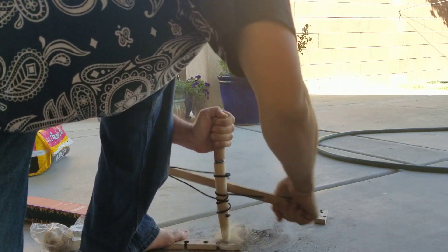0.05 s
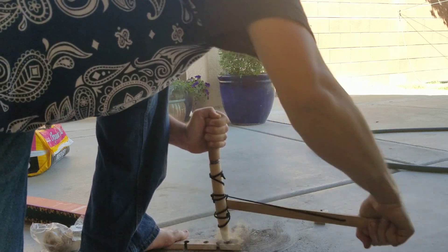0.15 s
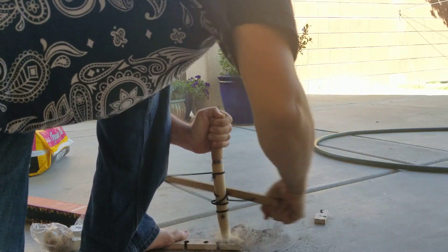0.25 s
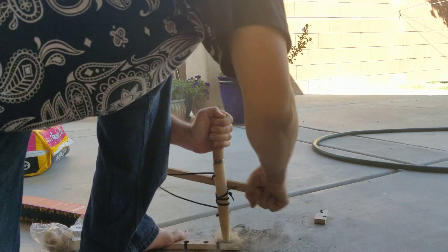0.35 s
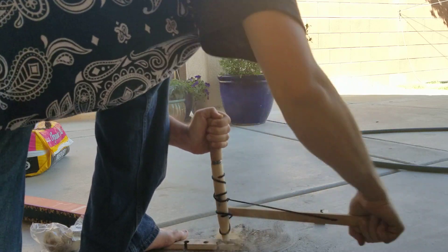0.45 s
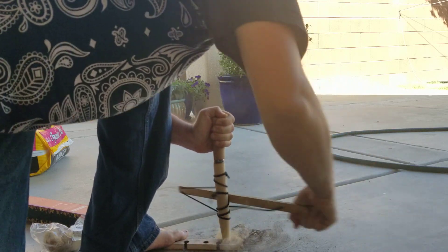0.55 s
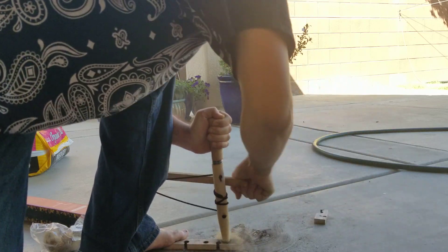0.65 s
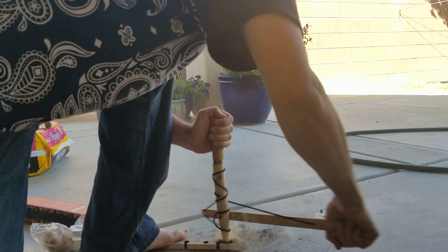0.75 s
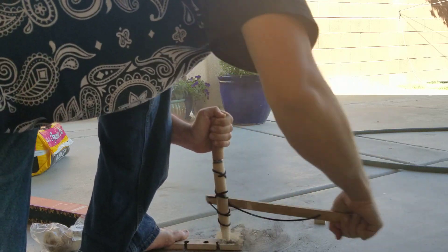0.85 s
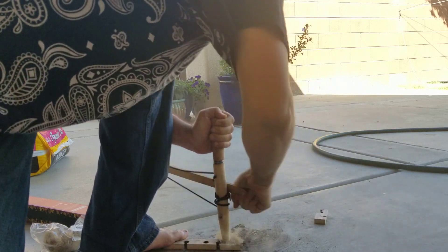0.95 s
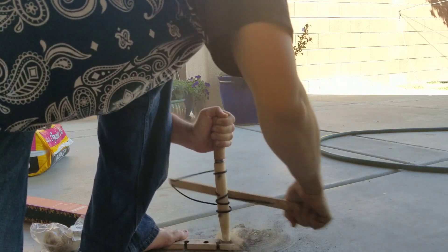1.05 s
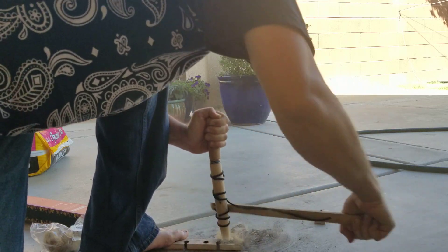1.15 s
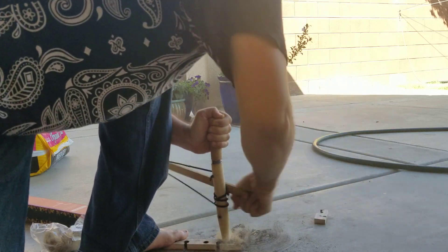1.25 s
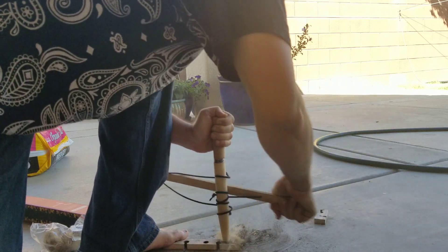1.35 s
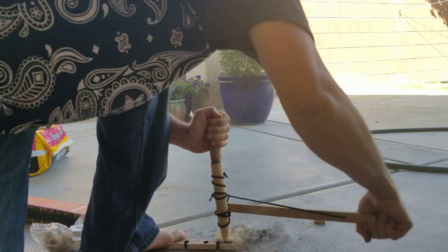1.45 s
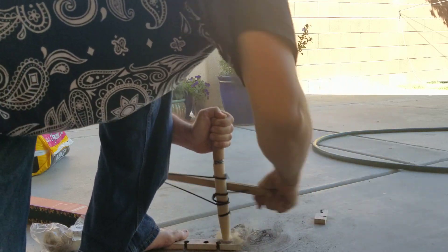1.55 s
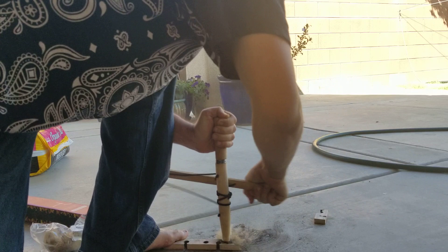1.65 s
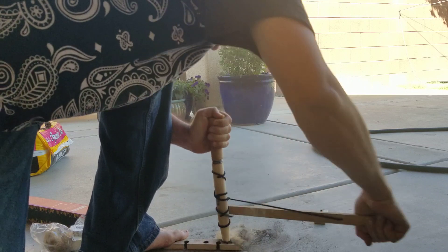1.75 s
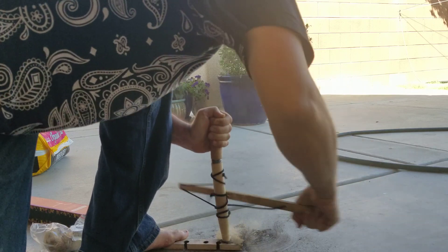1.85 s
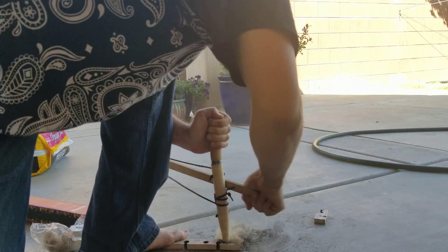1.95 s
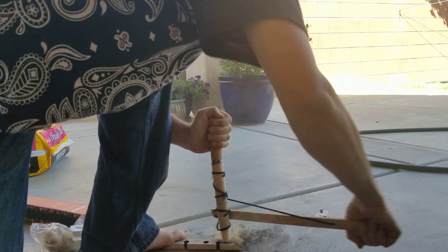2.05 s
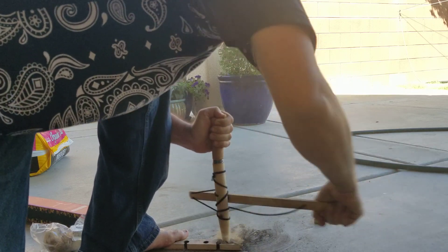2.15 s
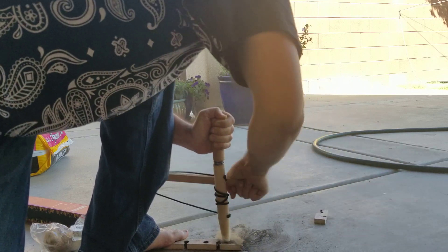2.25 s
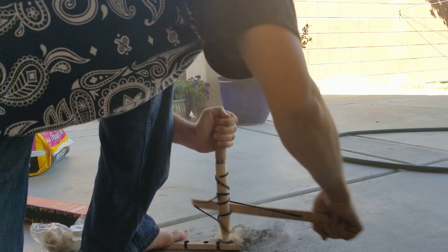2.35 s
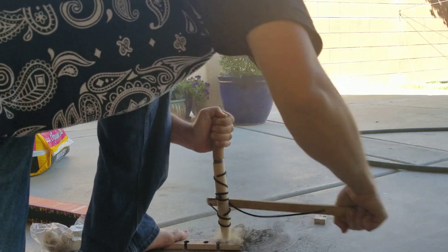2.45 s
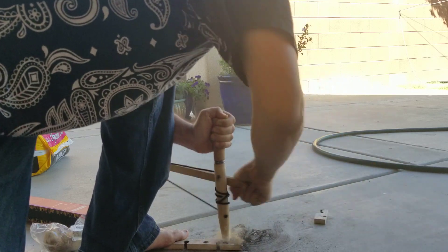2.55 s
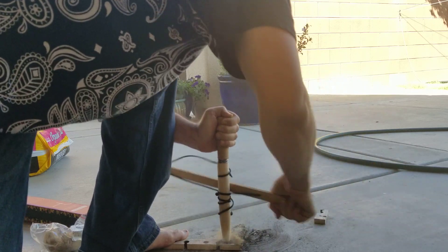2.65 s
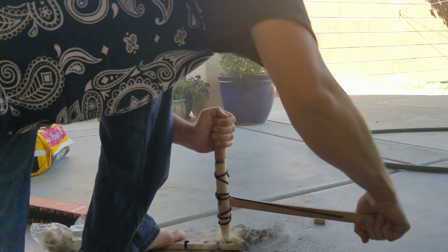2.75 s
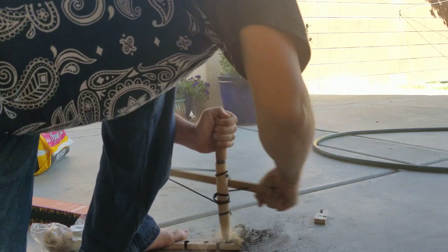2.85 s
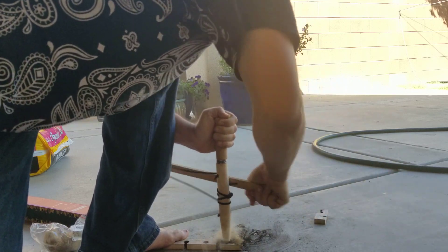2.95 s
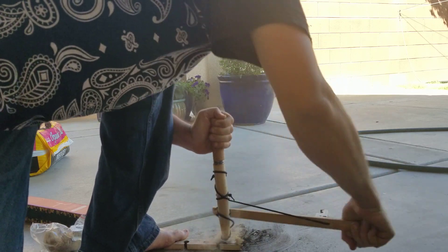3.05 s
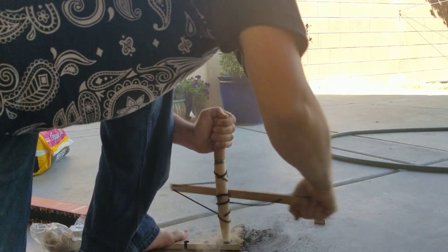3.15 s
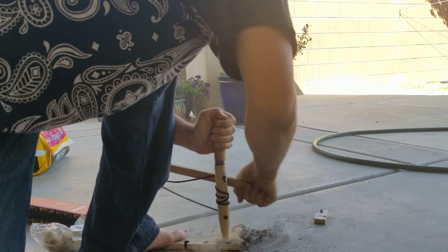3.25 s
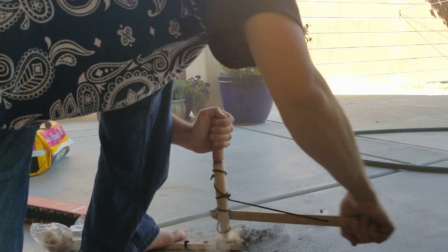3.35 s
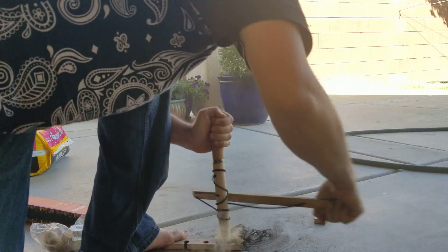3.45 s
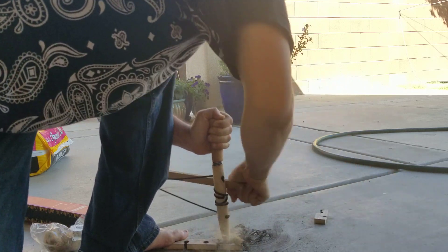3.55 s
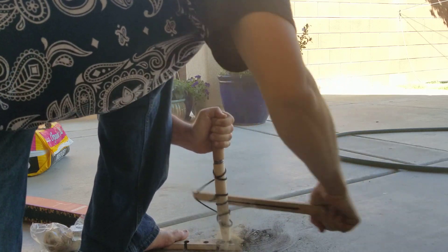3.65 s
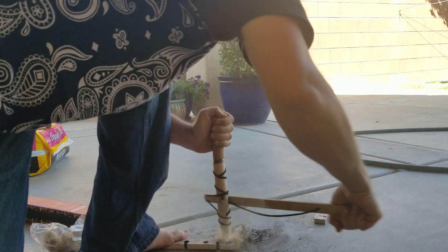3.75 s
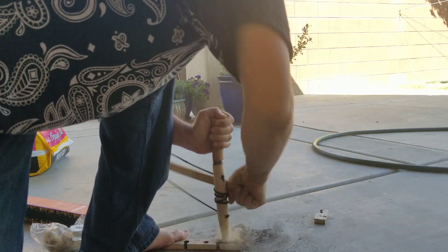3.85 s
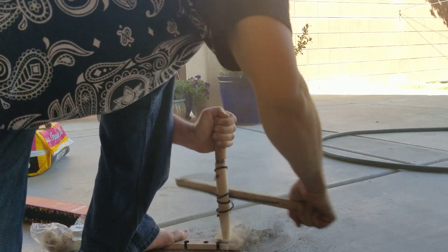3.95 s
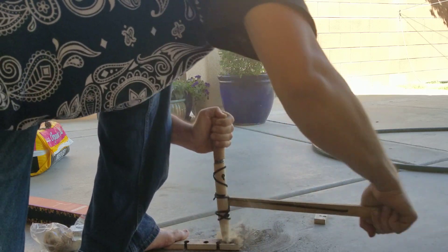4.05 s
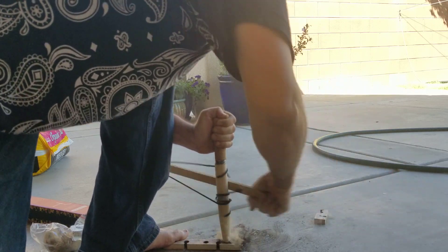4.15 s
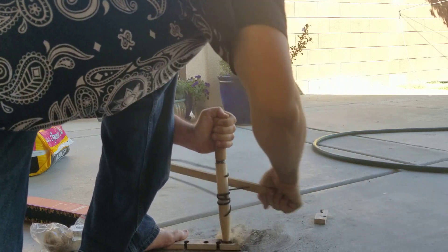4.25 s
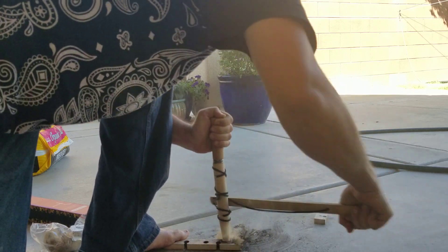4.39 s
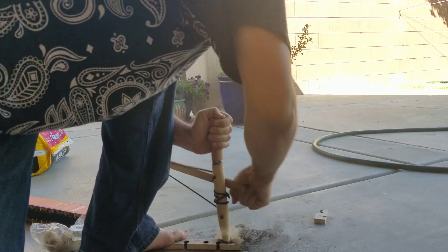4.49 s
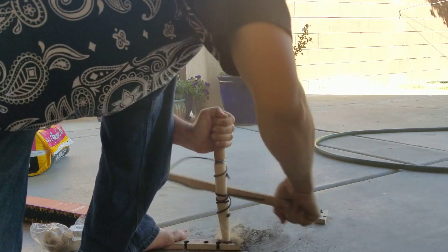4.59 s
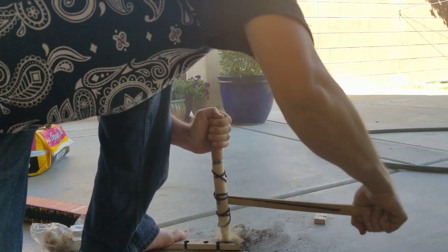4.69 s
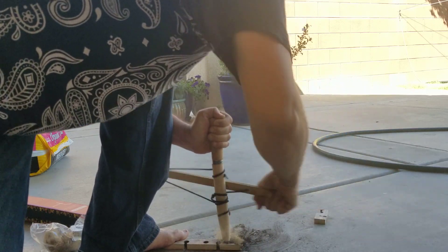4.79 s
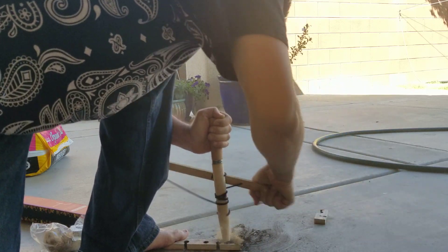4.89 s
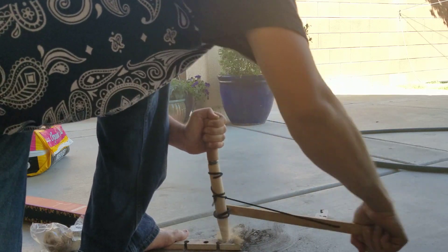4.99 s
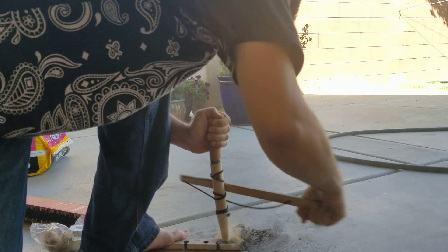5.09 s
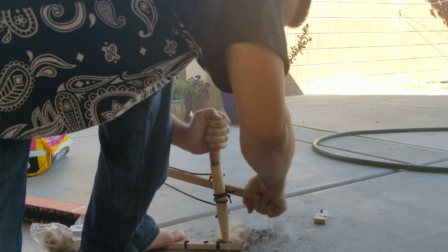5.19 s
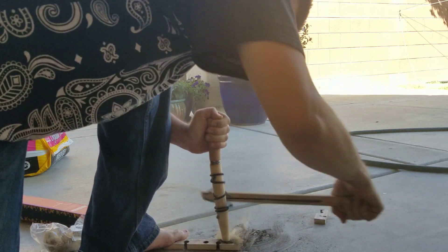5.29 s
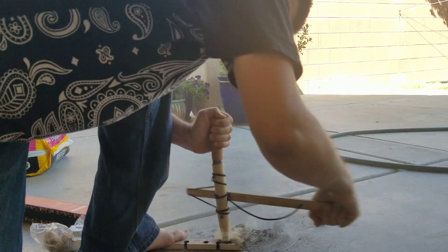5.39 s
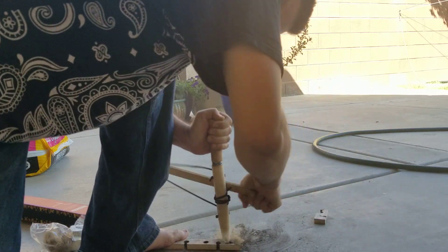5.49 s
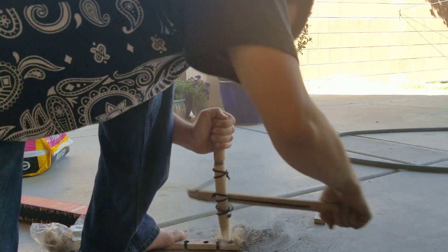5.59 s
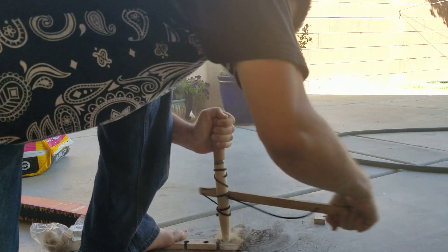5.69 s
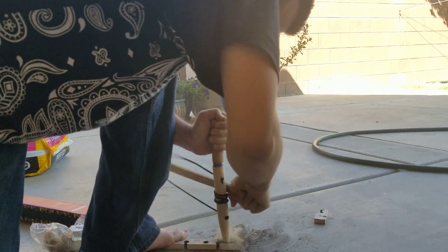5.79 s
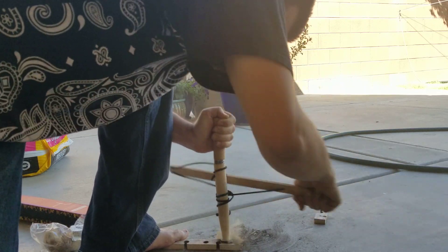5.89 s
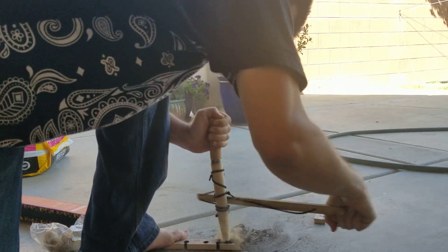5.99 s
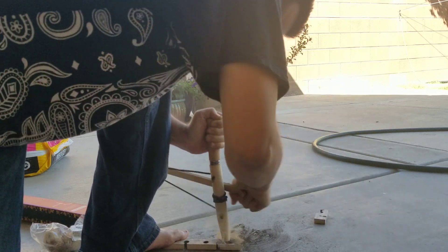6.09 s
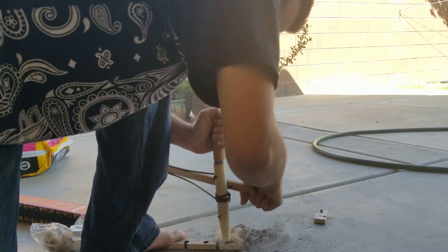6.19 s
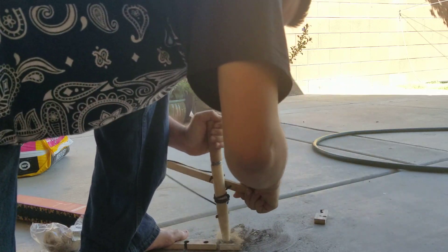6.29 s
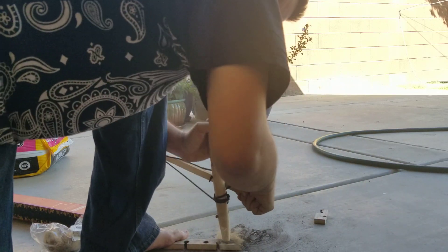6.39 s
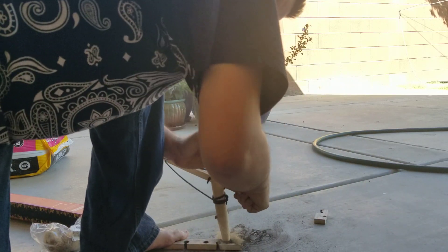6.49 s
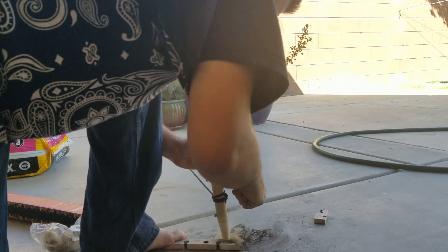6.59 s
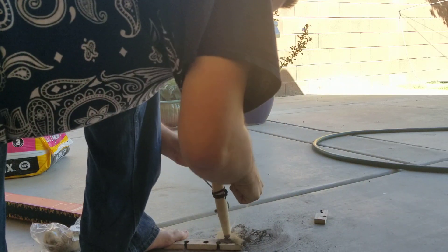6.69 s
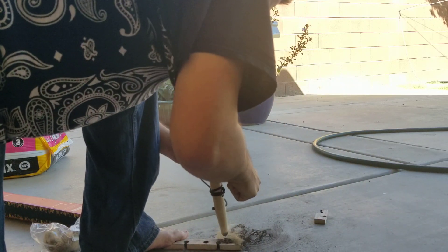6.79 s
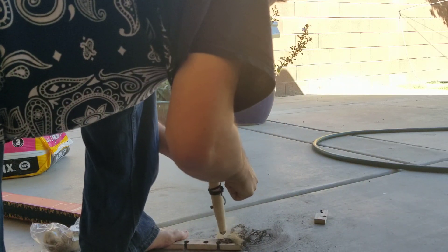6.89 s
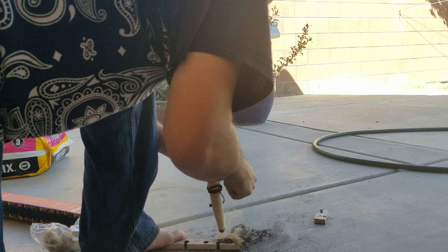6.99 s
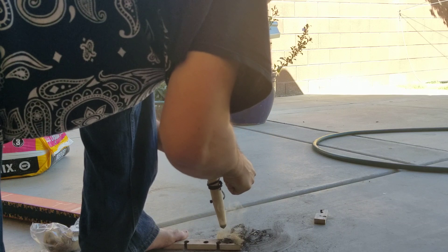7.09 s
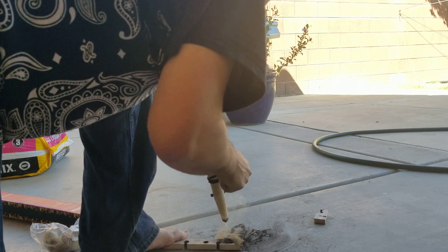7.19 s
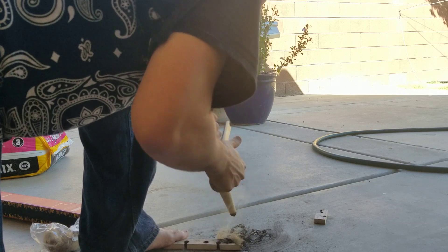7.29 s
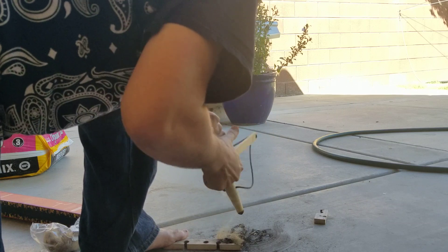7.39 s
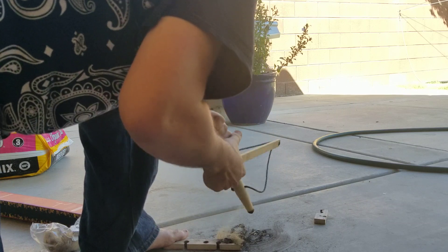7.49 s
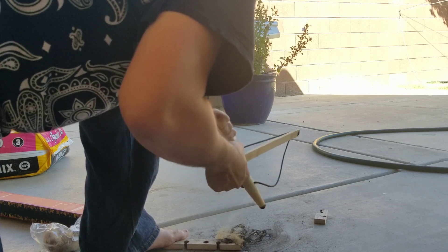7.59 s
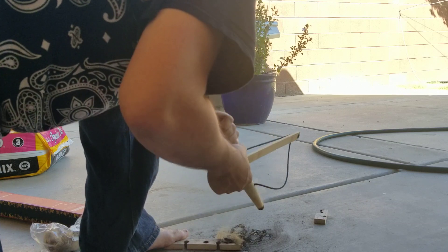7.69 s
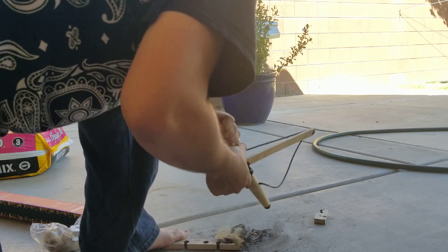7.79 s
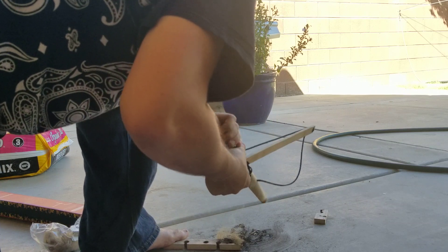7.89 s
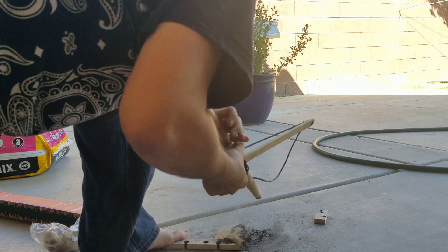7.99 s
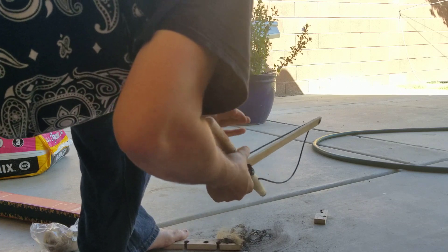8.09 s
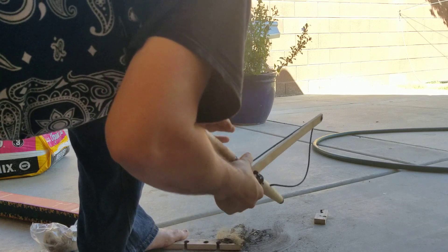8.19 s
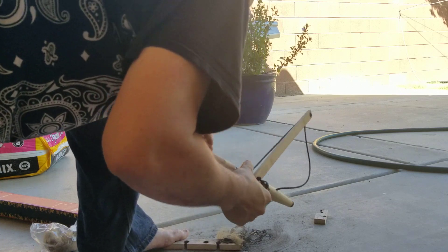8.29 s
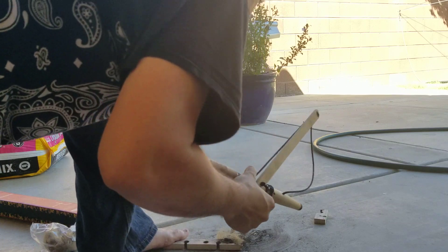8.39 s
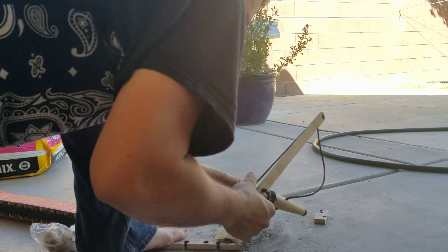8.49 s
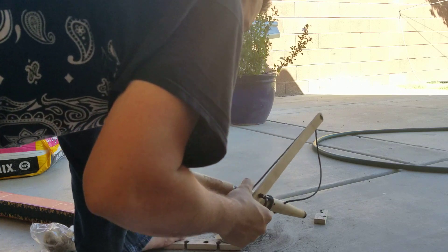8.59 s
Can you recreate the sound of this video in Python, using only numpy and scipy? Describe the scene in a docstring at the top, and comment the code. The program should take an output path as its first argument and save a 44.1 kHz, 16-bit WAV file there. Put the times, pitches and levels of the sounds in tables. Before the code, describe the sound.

Rough sawing-like friction starts at full speed, roughly six alternating strokes per second, with clicking cord, woody clacks and a dull board thud beneath. It grows somewhat heavier, then stops just after six seconds. The much quieter remainder holds soft open air, a faint far motor and rumble, brief descending bird whistles and barely audible handling. The drill is close to the microphone, slightly left, on a hard patio with nearby walls.

```python
"""Bow drill on a patio

Each push and pull of a bow spins a wooden spindle: filtered noise, broken into grains, rasps stroke by stroke.
Short bursts of noise make the knocks of the bow, which ring the wood, and the snaps of the cord. The drilling
stops. A wavering sine drones as a far engine over a low rumble, a bird buzzes briefly and whistles falling
notes (gliding sines), and hands handle the kit with faint rustles and a tap. Soft noise is the open air."""
import sys
import numpy as np
from scipy import signal
from scipy.fft import rfft, irfft, next_fast_len
from scipy.io import wavfile
from scipy.ndimage import uniform_filter1d

SR = 44100
rng = np.random.default_rng(int(sys.argv[2]) if len(sys.argv) > 2 else 0)


def volts_from_decibels(level):
    """Turn decibel levels (scalar or array-like) into linear amplitude factors."""
    exponent = np.asarray(level, float) / 20
    return 10 ** exponent


def wrap_up_sound(samples):
    """Save the sound to the file named by the first command line argument, as 16-bit audio."""
    columns = np.atleast_2d(samples).T
    # keep every value between -1 and 1, then stretch to whole-number steps
    tamed = np.clip(columns, -1, 1)
    steps = np.round(tamed * 32767).astype(np.int16)
    wavfile.write(sys.argv[1], SR, steps)


N = 381024  # length [samples]
ALIKE_HZ = 790  # below this the rasp is the same at both ports of the microphone


def level(x, db):
    """Scale to an rms level in dB."""
    return x * volts_from_decibels(db) / np.sqrt(np.mean(x ** 2))


def shape(x, gain):
    """Filter by a gain that is a function of frequency."""
    size = next_fast_len(N)
    hz = np.arange(size // 2 + 1) * SR / size + 1e-3  # just above 0, for the log axis
    return irfft(rfft(x, size) * gain(hz), size)[..., :N]


def colour(points):
    """Gain drawn through (frequency, level) points, straight on a log frequency axis."""
    hz, db = np.transpose(points)
    return lambda f: volts_from_decibels(np.interp(np.log(f), np.log(hz), db))


def band(x, lo_hz, hi_hz, order=2):
    """Keep only the sound between two frequencies."""
    edges_hz = [lo_hz, min(hi_hz, 0.45 * SR)]
    return signal.sosfilt(signal.butter(order, edges_hz, "bandpass", fs=SR, output="sos"), x)


def curves(table):
    """Draw each column of a table sample by sample; the first column is time."""
    s, *columns = np.transpose(table)
    return [np.interp(np.arange(N) / SR, s, c) for c in columns]


def walk(rate):
    """Slow random wander: values held for 1 / rate seconds, then smoothed twice; spread near 1."""
    k = int(SR / rate)
    held = np.repeat(rng.standard_normal(N // k + 1), k)
    return 1.63 * uniform_filter1d(uniform_filter1d(held, k), k)[:N]


def ports(alike_hz):
    """Noise at two microphone ports: the same in the bass, unrelated in the treble."""
    mid, side = rng.standard_normal((2, N))
    side = band(side, alike_hz, SR)
    return (mid + side * np.array([[1], [-1]])) / np.sqrt(2)


def fade(x, ms):
    """Let every start die away exponentially."""
    return signal.lfilter([1], [1, -np.exp(-1000 / (ms * SR))], x)


def grit(rate, scatter_db, ms):
    """Fibres that catch and tear: sudden starts of uneven size with short fades."""
    size_db = scatter_db * np.minimum(rng.exponential(size=N), 2.8)
    starts = (rng.random(N) < rate / SR) * volts_from_decibels(size_db)
    return level(fade(starts, ms), 0)


def patio(x, t60, db):
    """Ground, wall and the driller's body scatter the sound back, differently to each port."""
    t = np.arange(SR // 4) / SR
    tail = band(rng.standard_normal((2, len(t))), 800, 8000) * np.exp(-np.log(1000) * t / t60)
    tail *= volts_from_decibels(db) / np.sqrt(np.sum(tail ** 2, axis=1, keepdims=True))
    return x + signal.oaconvolve(x, tail, axes=1)[:, :N]


# Tone of the rasp: (frequency [Hz], relative level per Hz [dB])
RASP_TONE = [(100, -33.5), (160, -9), (265, 0.5), (380, -10), (450, 2.5), (650, -6), (1250, -6.5),
             (1600, 0), (2100, -1.5), (5500, -0.5), (7500, -1), (8900, -14), (12000, -4.5), (16000, -6)]


def drill():
    """Char is ground off in grains; the board thuds under the load and the cord creeps on the spindle."""
    rasp_db, thud_db, cord_db = bowing()
    # fibres tear only while the spindle is at speed
    bite = np.clip((rasp_db + 55) / 14, 0, 1)
    grain = volts_from_decibels(2.04 * walk(45)) * (0.52 + 0.56 * bite * grit(rate=250, scatter_db=2.5, ms=1.66))
    wood, other = (shape(ports(ALIKE_HZ) * grain, colour(RASP_TONE)) for _ in range(2))
    # the heavy board swells less than the rasp
    thud = level(band(other, 100, 945), 2.58) * volts_from_decibels(thud_db - 0.043 * (rasp_db + 38.5))
    # the colour of the rasp shifts as the tip meets fresh wood or char
    shift = sum(band(wood, lo, hi, order=1) * 0.18 * walk(16) for lo, hi in [(1400, 2300), (3000, 5000)])
    rasp = level(band(wood + shift, 810, 6500), 1.32)
    creep = 1.7 + 0.19 * bite * grit(rate=150, scatter_db=10.5, ms=0.6)
    cord = level(band(other * creep, 8900, SR), 6.15) * volts_from_decibels(cord_db + 0.014 * (rasp_db + 37))
    # the weight on the spindle shakes the slab once a stroke
    slab = level(band(rng.standard_normal(N), 57, 78), -17)
    # board and spindle keep humming at their modes while the spindle turns, also through the turns
    modes = level(ring(ports(ALIKE_HZ)), -18.5) * volts_from_decibels(4.4 * walk(14))
    body = level(band(other, 390, 2500), -12.5)
    hum = (modes + body) * volts_from_decibels(-0.65 * np.maximum(rasp_db + 38.5, -20))  # offsets part of the stroke's swell
    return (thud + rasp + cord + slab + hum) * volts_from_decibels(rasp_db)


# Bow strokes, heavy and light by turns:
# (time of the turn [s], time when fastest [s], relative rasp level when fastest [dB])
BOW_STROKES = [(0.041, 0.159, -46), (0.203, 0.311, -36), (0.386, 0.47, -45.5), (0.53, 0.622, -38.5),
               (0.736, 0.824, -40), (0.842, 0.973, -39), (1.038, 1.161, -44.5), (1.174, 1.285, -38),
               (1.368, 1.448, -41.5), (1.504, 1.597, -37), (1.704, 1.76, -43), (1.819, 1.928, -36.5),
               (2.015, 2.079, -39.5), (2.139, 2.225, -34), (2.334, 2.4, -41), (2.47, 2.552, -36),
               (2.668, 2.727, -38), (2.8, 2.883, -32.5), (2.982, 3.066, -43), (3.151, 3.225, -33.5),
               (3.307, 3.387, -40.5), (3.455, 3.529, -33), (3.637, 3.696, -41), (3.772, 3.846, -35),
               (3.945, 4.026, -40.5), (4.09, 4.192, -34.5), (4.25, 4.371, -41.5), (4.409, 4.499, -35.5),
               (4.572, 4.682, -42), (4.726, 4.808, -35.5), (4.897, 4.996, -41), (5.058, 5.168, -36.5),
               (5.233, 5.301, -40.5), (5.401, 5.466, -31), (5.546, 5.659, -43), (5.692, 5.769, -33.5),
               (5.901, 5.918, -40.5), (6.016, 6.091, -35.5)]
# The opening, already at full speed: (time [s], relative rasp level [dB])
OPENING = (0.011, -42.5)
# The spindle runs down: (time [s], relative rasp level [dB])
RUN_DOWN = [(6.14, -45), (6.24, -58.5), (6.36, -63), (6.55, -108)]
# Slow change of balance: (time [s], board thud against rasp [dB], cord hiss against rasp [dB])
BALANCE = [(0.3, -8.5, -3.5), (2.0, -9.5, -3.5), (3.0, -10, -5), (4.5, -10, -4), (6.0, -10, -6)]


def bowing():
    """A stroke gains speed quickly after the turn and dies away evenly; a heavy one lingers into the turn."""
    turn_s, top_s, top_db = np.transpose(BOW_STROKES)
    ending_db = np.append(OPENING[1], top_db[:-1])  # strength of the stroke that ends at each turn
    turn_db = -53 + 0.55 * (ending_db + 37)
    # the first, steep part of the rise
    knee_s = turn_s + 0.18 * (top_s - turn_s)
    knee_db = turn_db + 0.36 * (top_db - turn_db)
    times = np.ravel([turn_s, knee_s, top_s], "F")
    levels = np.ravel([turn_db, knee_db, top_db], "F")
    rows = np.transpose([times, levels])
    return curves(np.vstack([[OPENING], rows, RUN_DOWN])) + curves(BALANCE)


# Modes of spindle and board: (frequency [Hz], relative level [dB], time to fall by 60 dB [s])
WOOD_MODES = [(310, -6, 0.01), (445, -5.5, 0.22), (504, -9, .07), (1658, -2.5, 0.0099), (1914, -3, 0.014),
              (2910, -2.5, .007), (4960, 7, 0.024)]


def ring(x):
    """Spindle and board ring briefly at their modes: a sum of dying sines answers the input."""
    t = np.arange(SR // 10) / SR
    modes = sum(volts_from_decibels(db) * np.sin(2 * np.pi * hz * t) * np.exp(-np.log(1000) * t / t60) / t60
                for hz, db, t60 in WOOD_MODES)
    return signal.oaconvolve(x, modes[None] / np.sqrt(np.sum(modes ** 2)), axes=1)[:, :N]


# Knocks of bow and spindle, relative levels: (time [s], blow [dB], crack [dB], thud [dB])
BOW_KNOCKS = [(0.106, -35, -37.5, -54), (.2743, -34, -36, -42), (.5441, -32, -30.5, -53),
              (.631, -23.5, -25, -36), (0.7946, -16.5, -13, -33), (0.9371, -24.5, -31.5, -36.5),
              (0.9697, -26, -25.5, -37.5), (1.204, -37.5, -24, -41.5), (1.5243, -14.5, -21.5, -44),
              (1.54, -30, -40.5, -44), (1.573, -25.5, -31, -42), (1.7392, -43, -46, -44),
              (1.9295, -21.5, -23.5, -34.5), (2.164, -23, -33, -54), (2.2118, -15.5, -25, -35),
              (2.479, -28, -33.5, -42), (2.5411, -22, -26.5, -38), (2.6984, -28, -36.5, -46),
              (2.867, -14.5, -20, -32), (3.166, -39.5, -30, -48), (3.1951, -18.5, -24.5, -33),
              (3.3535, -33, -36.5, -40), (3.4529, -33.5, -35.5, -56), (3.5129, -18, -21.5, -32.5),
              (3.6719, -31, -35, -44), (3.781, -13, -16.5, -41.5), (3.797, -30, -28.5, -47),
              (3.8286, -18, -17, -35.5), (3.8463, -22.5, -23.5, -42), (3.9893, -38, -44, -48),
              (4.0991, -45, -34.5, -58), (4.157, -19, -37.5, -29.5), (4.3531, -31, -33.5, -46),
              (4.4136, -31.5, -34.5, -56), (4.4731, -21, -24.5, -40), (4.6355, -41, -28.5, -43.5),
              (4.7481, -33, -36, -46.5), (4.7911, -19, -25, -38), (4.9678, -30, -41, -50),
              (5.081, -32.5, -38.5, -48), (5.1338, -16.5, -21.5, -34.5), (5.403, -38, -24.5, -44),
              (5.445, -14, -13.5, -32.5), (5.737, -42.5, -30, -46), (5.7512, -14.5, -19, -33.5),
              (6.038, -18.5, -28, -46), (6.0666, -25.5, -37, -47)]
# The cord snaps taut, the last time in the hands: (time [s], relative snap level [dB])
CORD_SNAPS = [(0.1582, -23), (0.2909, -15.5), (0.4351, -13), (0.6121, -13.5), (0.7581, -10.5),
              (0.9063, -20), (.953, -14), (1.0951, -16), (1.2627, -15.5), (1.408, -10), (1.585, -13.5),
              (1.8737, -19), (1.9153, -10.5), (2.0428, -13), (2.0487, -18), (2.3746, -13), (3.184, -13),
              (3.2109, -14), (3.3592, -21.5), (3.488, -16), (3.526, -14), (3.821, -20.5), (4.1352, -17.5),
              (4.4566, -25), (5.436, -15.5), (5.6327, -16), (6.7818, -41.5)]


def knocks():
    """A dull blow and a thud that ring the wood, a sharp crack, and a bright snap of the cord."""
    # a knock has a snap 4 dB under its crack; a cord snap brings a weaker blow, crack and thud
    rows = [(s, blow, crack, crack - 4, thud) for s, blow, crack, thud in BOW_KNOCKS]
    rows += [(s, db - 25.5, db - 10, db, db - 33.5) for s, db in CORD_SNAPS]
    s, *parts_db = np.transpose(rows)
    at = np.zeros((4, N))
    at[:, (s * SR).astype(int)] = volts_from_decibels(np.array(parts_db))
    blow_at, crack_at, snap_at, thud_at = at
    noise = ports(1700)
    # each part is a click and a burst of noise; all but the thud drag a longer, weaker scrape after them
    blow = 3.66 * blow_at + 0.68 * noise * (fade(blow_at, 2.3) + 0.093 * fade(blow_at, 22))
    thud = 3.7 * thud_at + 1.9 * noise * fade(thud_at, 5.9)
    crack = 3.4 * crack_at + noise * (0.64 * fade(crack_at, 0.96) + 0.081 * fade(crack_at, 9.4))
    snap = 1.3 * snap_at + noise * (0.84 * fade(snap_at, 0.65) + 0.072 * fade(snap_at, 9))
    wood = volts_from_decibels(2) * band(1.43 * blow + 0.72 * ring(blow), 1400, 4500, order=3)
    wood = wood + volts_from_decibels(7) * band(thud + 0.79 * ring(thud), 180, 1700)
    return wood + volts_from_decibels(10.5) * band(crack, 3670, 7500, order=3) + volts_from_decibels(7) * band(snap, 11000, 15000)


# Faint swells of noise, first a buzz as the bird starts, then rustles: # (start time [s], rise [s], fall to 1/e
# [s], relative level [dB], lowest frequency [Hz], highest [Hz])
FAINT_RUSTLES = [(7.448, .004, 0.04, -60.5, 4030, 5900), (8.087, .003, 0.073, -63.5, 1010, 3010),
                 (8.42, 0.059, 0.14, -73.5, 1000, 5520), (8.55, .07, .1, -62.5, 887, 12000)]


def rustles():
    """Short swells of grainy noise: a buzz as the bird starts, then hands on the kit."""
    t, out = np.arange(N) / SR, 0
    noise = ports(1200) * volts_from_decibels(2.5 * walk(80))
    for s, rise, fall, db, lo_hz, hi_hz in FAINT_RUSTLES:
        swell = np.clip((t - s) / rise, 0, 1) * np.exp(-np.maximum(t - s - rise, 0) / fall)
        out = out + level(band(noise, lo_hz, hi_hz), db) * swell
    return out


# A soft tap on wood: (time [s], relative level [dB], pitch [Hz], time to fall by 60 dB [s])
SOFT_TAP = (8.0865, -49, 1400, .012)


def tap():
    """One short hollow ring, a dying sine, and its weaker rebound 6.5 ms later."""
    s, db, hz, t60 = SOFT_TAP
    t = np.arange(N) / SR - s
    one = lambda t: (t > 0) * np.sin(2 * np.pi * hz * t) * np.exp(-np.log(1000) * np.abs(t) / t60)
    return volts_from_decibels(db) * (one(t) + 0.6 * one(t - 0.0065))


def whistle(table, wobble, waver_db):
    """A near sine that glides along its table and fades in and out at the ends."""
    hz, db = curves(table)
    t = np.arange(N) / SR
    on = uniform_filter1d(1. * (t > table[0][0]) * (t < table[-1][0]), 600)
    span = on > 0
    waver = walk(50)[span]
    phase = 2 * np.pi * np.cumsum(hz[span] * (1 + wobble * waver)) / SR
    out = np.zeros(N)
    out[span] = np.sqrt(2) * volts_from_decibels(db[span] + waver_db * waver) * on[span] * np.sin(phase)
    return out


# Bird notes, one list each: (time [s], pitch [Hz], relative level [dB])
BIRD_NOTES = [
    [(7.49, 5370, -67.5), (7.56, 5280, -56.5), (7.6, 5010, -48), (7.625, 4660, -59), (7.67, 4650, -74)],
    [(7.69, 4210, -60), (7.87, 3947, -62), (8.06, 3565, -67), (8.1, 3660, -75)],
    [(7.69, 3860, -66.5), (7.78, 3557, -67.5), (7.88, 3400, -71)],
]


def bird():
    """Falling whistled notes, unsteady in pitch and level, a little louder at the left port."""
    return sum(whistle(note, 0.0061, 3.8) for note in BIRD_NOTES) * volts_from_decibels(np.array([[1.5], [-1.5]]))


# Faint far tones, two high and one low, one list each: (time [s], pitch [Hz], relative level [dB])
FAR_TONES = [
    [(3.28, 3410, -68), (3.4, 3410, -63), (3.52, 3410, -65)],
    [(6.14, 3405, -63), (6.37, 3420, -72), (6.49, 3400, -84)],
    [(6.33, 505, -69), (6.52, 502, -72), (6.66, 497, -82)],
]


def far_tones():
    """Thin, nearly steady sines."""
    return sum(whistle(note, 0.002, 1.2) for note in FAR_TONES)


# Far traffic: (time [s], engine pitch [Hz], relative engine level [dB], relative rumble level [dB])
FAR_TRAFFIC = [(5.9, 119.1, -67, -62.5), (6.48, 109.7, -62.5, -61), (6.69, 116, -69.5, -69),
               (7.15, 106.9, -56, -59.5), (7.71, 104, -62.5, -62), (8.14, 119.5, -72.5, -68),
               (8.36, 92.6, -67.5, -59.5), (8.64, 97, -62.5, -56.5)]


def traffic():
    """The engine drones as a sine of wavering pitch and level; low noise rumbles under it."""
    hz, engine_db, rumble_db = curves(FAR_TRAFFIC)
    phase = 2 * np.pi * np.cumsum(hz * (1 + 0.025 * walk(9))) / SR
    engine = np.sqrt(2) * volts_from_decibels(engine_db + 2.3 * walk(10)) * np.sin(phase)
    rumble = level(band(ports(150), 33, 86, order=3), 2) * volts_from_decibels(rumble_db)
    return engine + rumble


# Tone of the open air: (frequency [Hz], relative level per Hz [dB])
AIR_TONE = [(90, -21), (150, 4), (300, -1), (500, -2), (800, -10), (1300, -12), (2000, -3), (3200, -16),
            (4200, -10.5), (6500, -13.5), (9000, -24.5), (12500, -10.5), (16000, -15.5)]


def open_air():
    """A soft hiss of coloured noise whose level wanders slightly."""
    return level(shape(ports(700), colour(AIR_TONE)), -67.5) * volts_from_decibels(0.4 * walk(3))


def garden():
    """Bird and far tones echo among walls; tap, rustles, traffic and open air are added without echo."""
    return patio(bird() + far_tones(), 0.31, -1.5) + tap() + rustles() + traffic() + open_air()


def scene():
    """The kit close by, nearer the left port, over the garden."""
    kit = patio(drill() + knocks(), 0.16, -11)
    kit[1] = np.roll(kit[1], 2)  # reaches the right port two samples later
    return kit + garden()


def low_pass(x):
    """Removes everything above the highest recorded frequency."""
    return signal.sosfilt(signal.butter(12, 16990, fs=SR, output="sos"), x)


# Difference between the ports: (frequency [Hz], left minus right [dB])
LEFT_OVER_RIGHT = [(60, 2), (300, 4.5), (1300, 4.5), (4000, 1.5), (8000, 9.5), (15000, 3.5)]


def record(dry):
    """The left port is more open, most of all in the treble; the top is cut."""
    left = colour(LEFT_OVER_RIGHT)

    def gain(f):
        top_cut = np.where(f > 15900, volts_from_decibels(-35.5), 1)
        return np.array([left(f) ** 0.5, left(f) ** -0.5]) * top_cut

    mix = shape(dry, gain)
    return low_pass(mix)


dry = scene()
out = record(dry)
wrap_up_sound(out)
```